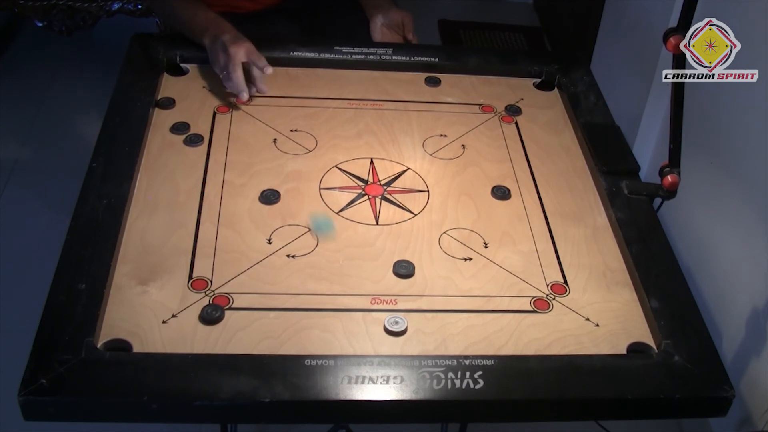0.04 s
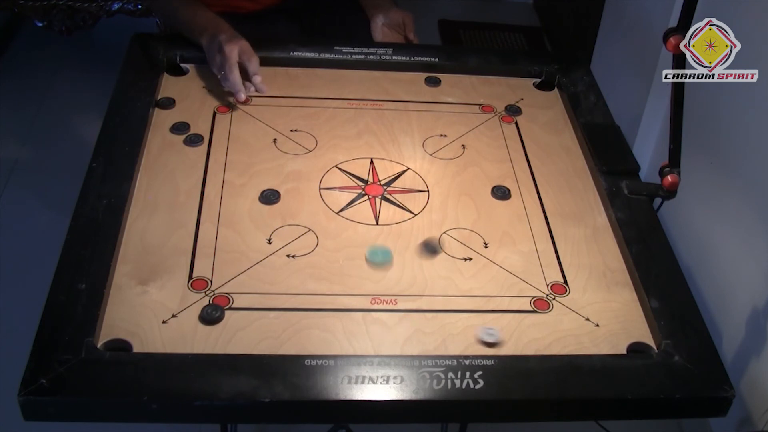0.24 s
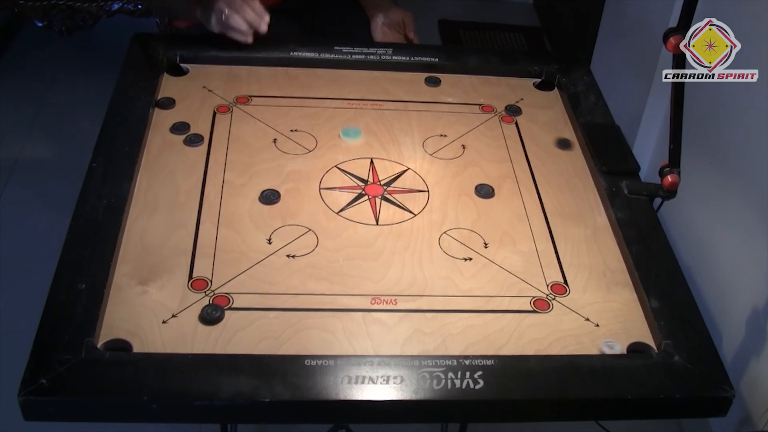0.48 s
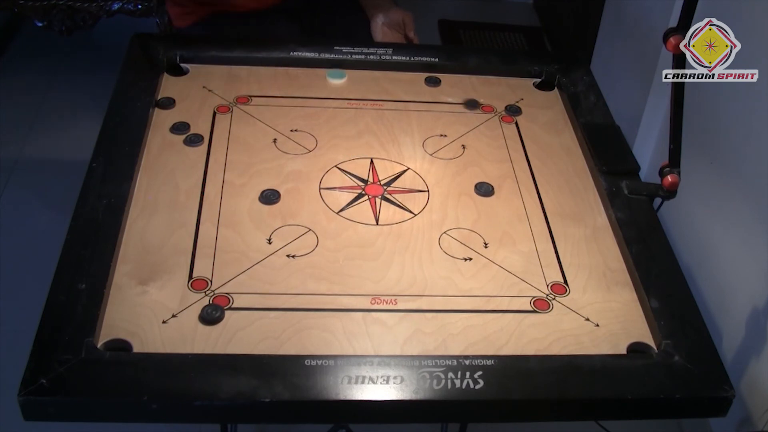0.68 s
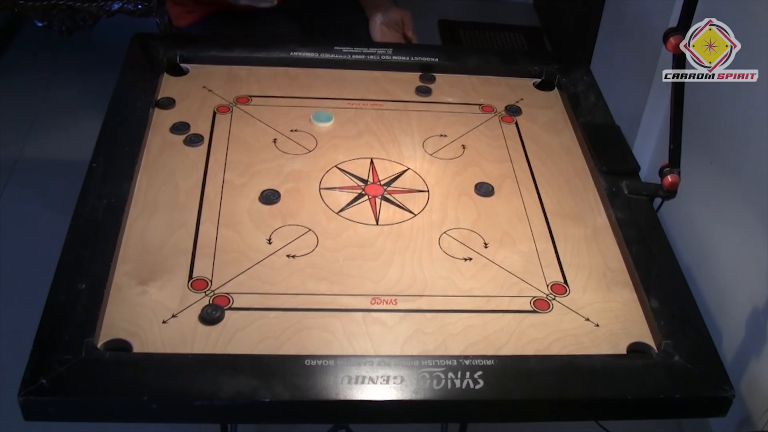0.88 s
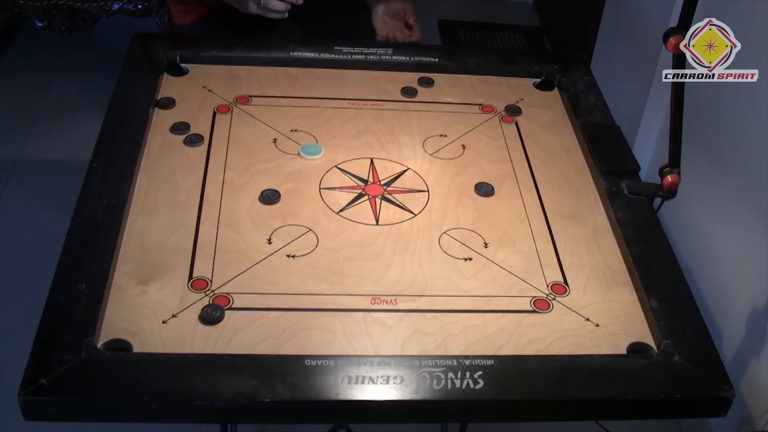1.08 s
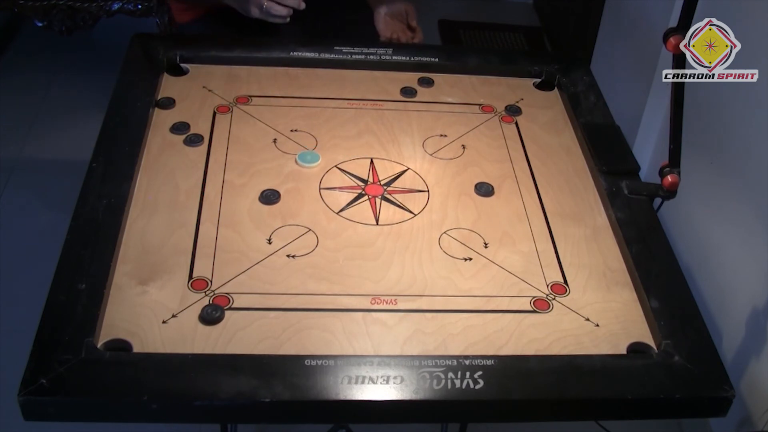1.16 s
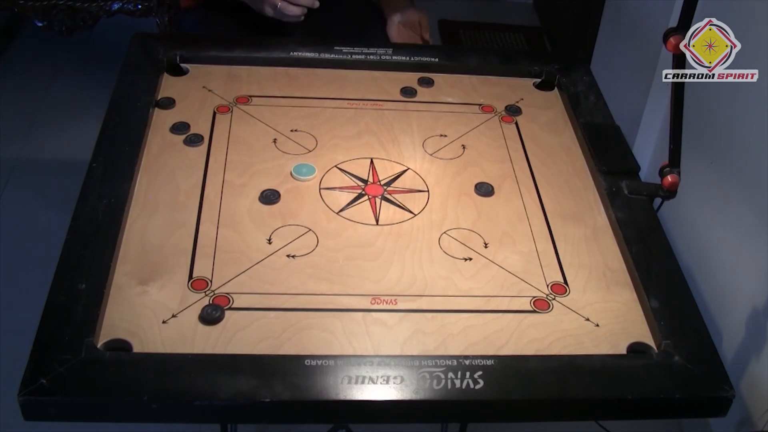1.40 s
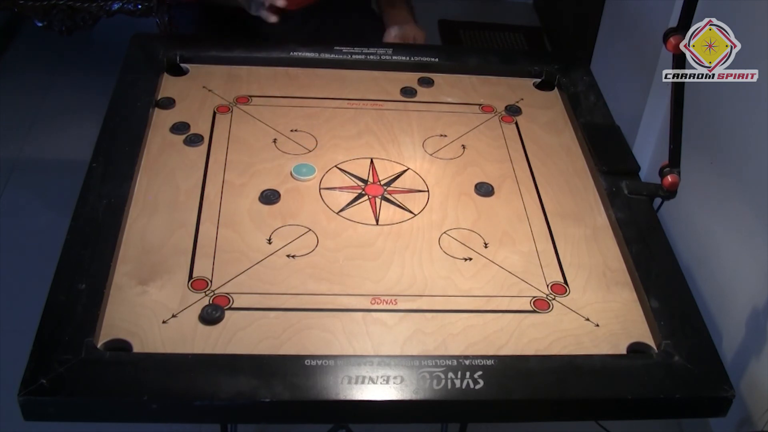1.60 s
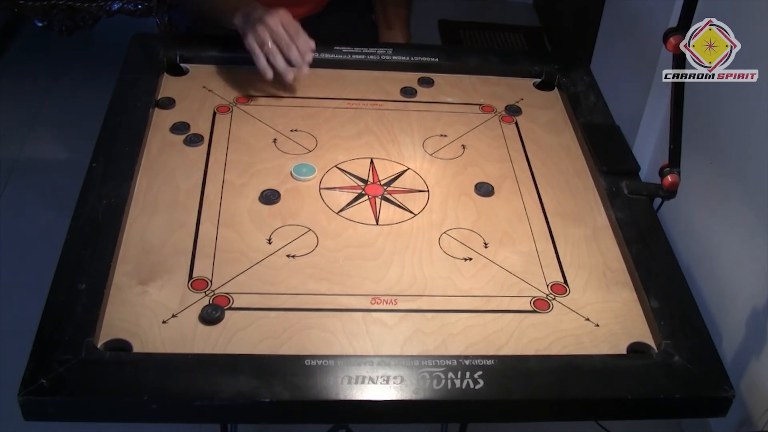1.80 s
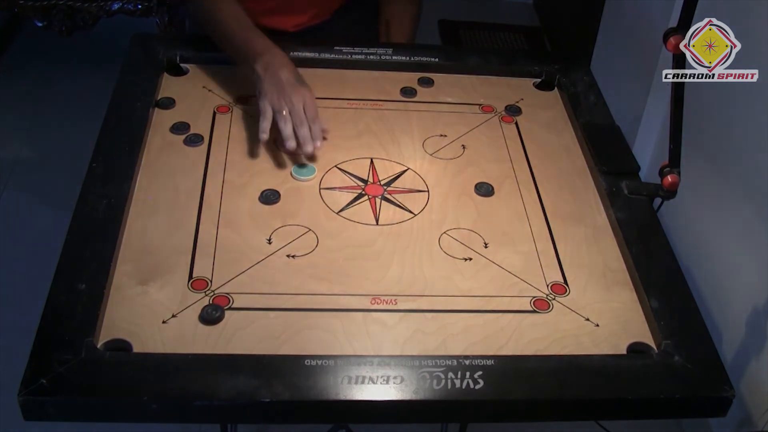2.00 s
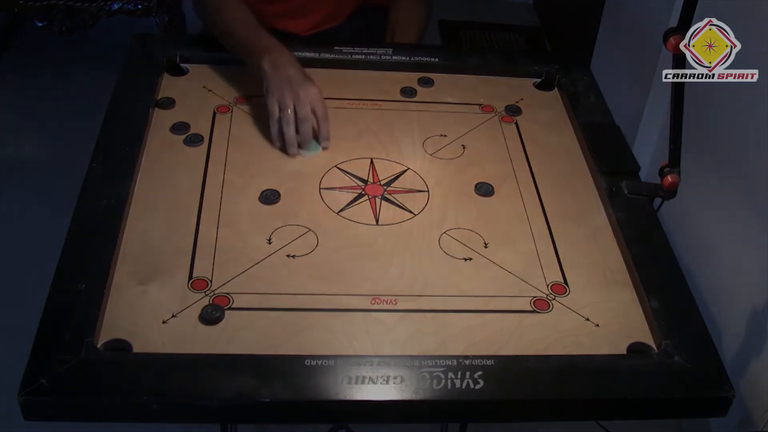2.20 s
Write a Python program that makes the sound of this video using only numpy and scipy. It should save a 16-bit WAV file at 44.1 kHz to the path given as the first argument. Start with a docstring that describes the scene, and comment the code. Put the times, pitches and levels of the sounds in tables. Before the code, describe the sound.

Carrom striker clacking sharply against wooden pieces and board edges in a quiet room

```python
"""In a quiet, hard-walled room a carrom board is still ringing from a knock as the striker is flicked.
It scrapes off over the plywood, and from 0.2 to 0.9 s it hits wooden pieces and rails: disc edges tick,
each blow is a short knock of the board with a faint ring, and the room answers. A limiter ducks the
loudest blows and their peaks clip. The striker glides to rest, ringing faintly at 1.4 s, and from 1.9 s
it is dragged back with a thin squeak. Throughout, a noise suppressor turns the quiet sound down."""
import sys
import numpy as np
from scipy import signal
from scipy.fft import rfft, irfft, next_fast_len
from scipy.io import wavfile
from scipy.ndimage import uniform_filter1d

SR = 44100
rng = np.random.default_rng(int(sys.argv[2]) if len(sys.argv) > 2 else 0)


def master(y):
    """Save y as 16-bit WAV."""
    cut = np.clip(np.atleast_2d(y).T, -1, 1)
    pcm = np.round(cut * 32767)  # scale
    wavfile.write(sys.argv[1], SR, pcm.astype(np.int16))


N = 99225

# Blows on the board. Each row: start in seconds, level before EQ in dB, four EQ gains in dB (bass,
# upper mid, treble, top), then board ring, rail ring, room send and left over right, all in dB.
BLOWS = [(-.07, -21, -17.5, 9, -8.5, -6, -11.5, -31.5, 0.5, -8),
         (.0422, -30, -8, 2.5, -25, -5, -13, -28.5, -9, -2.5),
         (.2120, 3, -2, -4, 1, -2, -7.5, -30.5, -4, -2),
         (.2178, -5, -7, -8.5, -2.5, -5.5, -13, -27, -17, -7),
         (0.4079, -37.5, -2.5, 0.5, 21, 15, -27, -31.5, 2.5, 2),
         (.5280, -19.5, -13, -8.5, 8, 10, -19.5, -6.5, 2, -1),
         (0.5292, -13, -16.5, 1, 4.5, 5, -18, 5, 0, -4),
         (.7287, -6.5, -1.5, -7, -6, -13.5, -8, -17, -3.5, -3),
         (.7312, -16, -4, 0, 6, 3, -21, -24, -1.5, 2.5),
         (.7495, -27, -9, -0.5, 14, 20, -18, -19.5, 3, -1.5),
         (0.7856, -29.5, -17, -7.5, 3, 0, -13, -27.5, -9, 9),
         (0.827, -31.5, 2, 12, -25, -4, -11, 2.5, 9, 2), (.8995, -19.5, -14, -8.5, 2, -18, -15, -2, -2, -2)]
# Where those four EQ gains sit, in Hz.
BLOW_EQ_HZ = [350, 2300, 4200, 10000]
# Partials of the board's damped knock, its lasting ring, the rail and the settling striker.
# Each row: pitch in Hz, relative level in dB, seconds to fall 60 dB.
KNOCK_MODES = [(556, -7, 0.036), (652, -3.5, 0.021), (801.3, 0, 0.067), (1179, -5.5, 0.089),
               (1416.7, -3.5, 0.11), (1491, -4.5, 0.051), (2230, 6.5, 0.017), (2900, -25.5, 0.04)]
RING_MODES = [(285, -5, .7), (404, -3, .5), (457, -0.5, 0.56), (653, -4, 0.93), (835, 4, 0.56),
              (1144, -9.5, 1), (1397, -1.5, 0.55), (1445, 5, 0.36), (1605, 6.5, 0.53), (1767, -6.5, 0.43),
              (2200, -9.5, 1), (2730, -14.5, 0.2), (2951, -3.5, 0.34), (3109, -4, 0.29)]
RAIL_MODES = [(724, -12, 0.25), (1092, 0, 0.037), (2190, -22, .04), (4888, -9, .012), (6060, -7.5, .012)]
STRIKER_MODES = [(1080, 0, 0.28), (1820, -8.5, 0.66), (1840, -10, 0.56), (2580, -6, 0.22),
                 (5250, -3.5, 0.15), (5620, -9, 0.194), (5760, -11, 0.14)]
# Tone of the clatter (the dense upper modes of board and discs), the reverb and the still air.
# Each row: frequency in Hz, relative level in dB.
CLATTER_COLOUR = [(100, -28.5), (250, -17.5), (480, -1), (900, 2.5), (1500, 5), (2800, -2), (4000, -11),
                  (6000, -10.5), (10000, -20), (13000, -26.5), (15500, -25)]
ROOM_COLOUR = [(300, 2), (450, 2), (800, 0), (1050, -2), (1480, 1), (1950, 1.5), (2400, 0), (3000, 3),
               (3900, -2), (6000, 0.5), (7500, -5.5), (9000, 3), (11000, -0.5)]
AIR_COLOUR = [(15, -52), (25, -20), (64, -9), (176, -4), (207, -15.5), (257, -4.5), (501, -12.5),
              (573, -5.5), (621, -12), (903, -11), (2370, -29), (15000, -47.5)]
# Length of the reverb. Each row: frequency in Hz, seconds to fall 60 dB.
ROOM_DECAY = [(200, 1), (800, 0.68), (2500, 0.66), (6000, 0.54), (14000, 0.33)]
# Stereo width of reverb, air and friction. Each row: frequency in Hz, side over mid in dB.
STEREO_WIDTH = [(200, -8), (1000, -10.5), (2500, -9.5), (5000, -5.5), (10000, 0.5)]
# Fader moves for the gliding discs, the scrape after the flick and the drag back.
# Each row: time in seconds, level in dB.
GLIDE_FADER = [(0, -45), (1.0, -64.5), (1.25, -49), (1.43, -48), (1.6, -62.5), (1.9, -75.5)]
LAUNCH_FADER = [(.04, -70), (.048, -31.5), (.08, -36.5), (.105, -39.5), (.15, -60), (.19, -79)]
DRAG_FADER = [(1.9, -75), (2.03, -58.5), (2.12, -49.5), (2.2, -49), (2.25, -47)]
# Tone of the same three slides. Each row: frequency in Hz, relative level in dB.
GLIDE_COLOUR = [(100, -21.5), (280, 3), (700, -1), (1500, 0.5), (2500, -12.5), (5000, -19), (9000, -22.5),
                (12000, -27), (15000, -26)]
LAUNCH_COLOUR = [(100, -21), (300, 7), (550, -5), (850, 5.5), (1200, -4.5), (1700, 0), (2350, -5),
                 (3300, -36.5), (5200, -39), (6200, -17.5), (8000, -30.5), (14000, -30)]
DRAG_COLOUR = [(100, -9.5), (500, 4.5), (1500, 2.5), (2250, -6), (3300, -7), (5500, -6.5), (8300, -9),
               (10000, -15.5), (15200, -18.5)]
# Soft thumps of the hand on the board. Each row: start in seconds, gain in dB, rise in seconds.
HAND_THUMPS = [(.043, -33.5, 0.023), (2.141, -37.5, 0.032)]
# Sharp ticks of disc edges.
# Each row: start in seconds, peak before panning in dB, pitch in Hz, left over right in dB.
EDGE_TICKS = [(.1903, -31, 4260, 2.5), (.1923, -14.5, 3900, 6.5), (.2113, -20.5, 5004, 0),
              (.2120, 10.5, 3700, 6), (.2812, -16, 5407, 0), (.3938, -3, 4570, 1), (.8453, -12.5, 3740, 0)]
# Resonances of the dragged striker. Each row: centre in Hz, width in Hz, dB relative to the drag fader.
SQUEAK_BANDS = [(2220, 220, -6), (3150, 250, -14), (4900, 400, -10.5), (5600, 400, -14)]
# Where the noise suppressor is half closed. Each row: frequency in Hz, level in dB per bin.
GATE_THRESHOLD = [(150, -50.5), (1000, -50), (2500, -66), (5500, -70.5), (11000, -74.5)]


def undb(db):
    """Decibels to gain."""
    return 10 ** (np.asarray(db) / 20)


def curve_at(freqs, points):
    """Read (Hz, value) points on a log-frequency axis."""
    hz, values = np.array(points, float).T
    return np.interp(np.log(np.maximum(freqs, 1)), np.log(hz), values)


def unit_energy(x):
    """Scale to an average energy of 1 per channel."""
    return x / np.sqrt(np.mean(np.sum(x ** 2, axis=-1)))


def equalise(x, points):
    """Minimum-phase EQ through (Hz, dB) points, so nothing rings ahead of an attack."""
    n = 2 * next_fast_len(x.shape[-1])
    freqs = np.arange(n // 2 + 1) * SR / n
    cepstrum = irfft(curve_at(freqs, points) * np.log(10) / 20)
    cepstrum[1:n // 2] *= 2
    cepstrum[n // 2 + 1:] = 0
    return irfft(rfft(x, n) * np.exp(rfft(cepstrum)))[..., :x.shape[-1]]


def wide_noise():
    """Stereo noise, narrow in the bass and wider in the treble."""
    mid, side = rng.standard_normal((2, N))
    side = equalise(side, STEREO_WIDTH)
    return np.array([mid + side, mid - side])


def attack(t, rise_s):
    """Envelope that eases up from 0 to 1."""
    return 1 - np.exp(-t / rise_s)


def decay(t, t60_s):
    """Envelope that falls 60 dB in t60_s."""
    return np.exp(-np.log(1000) * t / t60_s)


def fader(points):
    """Gain that rides a unit-energy noise along (seconds, dB) points."""
    times, levels_db = np.array(points).T
    return np.sqrt(N) * undb(np.interp(np.arange(N) / SR, times, levels_db))


def pan(db):
    """Left and right gains; positive dB leans left."""
    return undb(np.array([[db], [-db]]) / 2)


def add(out, x, start_s):
    """Mix x into out at a start time, trimming what falls outside the scene."""
    start = int(round(start_s * SR))
    first, last = max(start, 0), min(start + x.shape[-1], N)
    out[..., first:last] += x[..., first - start:last - start]


def struck_modes(table, t, rise_s):
    """A struck body: decaying partials of alternating sign, with an energy of 1."""
    partials = sum((-1) ** k * undb(db) * np.sin(2 * np.pi * hz * t) * decay(t, t60)
                   for k, (hz, db, t60) in enumerate(table))
    return unit_energy(partials * attack(t, rise_s))


def board_blows():
    """Each blow sets board and rail ringing, with its own EQ; returns direct sound and room send."""
    contact_s, clatter_db = 0.00049, 0.5
    knock_send_db, rail_send_db = -5, -2
    t = np.arange(int(0.75 * SR)) / SR
    knock = struck_modes(KNOCK_MODES, t, contact_s)
    ring = struck_modes(RING_MODES, t, contact_s)
    rail = struck_modes(RAIL_MODES, t, rise_s=0.0015)
    burst = attack(t, rise_s=0.0011) * decay(t, t60_s=0.027)
    bass_cut = signal.butter(2, 240, "high", fs=SR)
    direct, send = np.zeros((2, N)), np.zeros(N)
    for start, db, *eq_db, ring_db, rail_db, send_db, pan_db in BLOWS:
        noise = rng.standard_normal(len(t)) * burst
        clatter = unit_energy(equalise(noise, CLATTER_COLOUR)) * undb(clatter_db)
        board = unit_energy(signal.lfilter(*bass_cut, knock + clatter))
        board_send = unit_energy(signal.lfilter(*bass_cut, undb(knock_send_db) * knock + clatter))
        layers = np.array([board, board_send, undb(rail_db) * rail, undb(ring_db) * ring])
        eq = sorted([(1200, 0), *zip(BLOW_EQ_HZ, eq_db)])  # pinned to 0 dB at 1200 Hz
        # Before EQ, board and rail share the energy of 10 ms at the blow's level.
        gain = undb(db) * np.sqrt(0.01 * SR) / np.hypot(1, undb(rail_db))
        board, board_send, rail_tock, board_ring = equalise(layers, eq) * gain
        add(direct, (board + rail_tock + board_ring) * pan(pan_db), start)
        add(send, (board_send + undb(rail_send_db) * rail_tock) * undb(send_db), start)
    return direct, send


def room_reverb(send):
    """Dense reflections off hard walls build up after a short gap and fade, the treble first."""
    predelay_s = 0.0038
    t, freqs = np.arange(N) / SR, np.arange(N // 2 + 1) * SR / N
    spectrum = rfft(equalise(wide_noise(), ROOM_COLOUR))
    tail = np.zeros((2, N))
    for hz, t60 in ROOM_DECAY:
        band = curve_at(freqs, [(centre, float(centre == hz)) for centre, _ in ROOM_DECAY])
        tail += irfft(spectrum * band, N) * decay(t, t60)
    build_up = attack(np.maximum(t - predelay_s, 0), rise_s=0.0039)
    response = unit_energy(tail * build_up)
    return signal.fftconvolve(send[None], response, axes=1)[:, :N] * pan(-1.2)


def still_air(level_db):
    """A steady, dark bed of room tone."""
    return unit_energy(equalise(wide_noise(), AIR_COLOUR)) * np.sqrt(N) * undb(level_db)


def disc_slide(levels, colour, grain_db, pan_db):
    """A disc rubs over the powdered board: friction noise with a fast, grainy flutter in level."""
    grain = uniform_filter1d(rng.standard_normal(N), size=200)
    friction = wide_noise() * undb(grain_db * grain / grain.std())
    return unit_energy(equalise(friction, colour)) * fader(levels) * pan(pan_db)


def hand_thumps(pitch_hz):
    """The board's lowest note swells under the hand and dies away."""
    t, out = np.arange(N) / SR, np.zeros(N)
    note = np.sin(2 * np.pi * pitch_hz * t) * decay(t, t60_s=0.5)
    for start, db, rise_s in HAND_THUMPS:
        add(out, note * attack(t, rise_s) * undb(db), start)
    return out


def edge_ticks(send_db):
    """Disc edges touch in clicks of a cycle or two; returns direct sound and room send."""
    t = np.arange(SR // 50) / SR
    envelope = attack(t, rise_s=0.00008) ** 2 * decay(t, t60_s=0.001)
    direct, send = np.zeros((2, N)), np.zeros(N)
    for start, peak_db, hz, pan_db in EDGE_TICKS:
        click = -np.sin(2 * np.pi * hz * t) * envelope
        click *= undb(peak_db) / np.abs(click).max()
        add(direct, click * pan(pan_db), start)
        add(send, click * undb(send_db), start)
    return direct, send


def striker_settle(start_s, energy_db):
    """The striker rings faintly as it comes to rest."""
    t, out = np.arange(N) / SR, np.zeros(N)
    add(out, struck_modes(STRIKER_MODES, t, rise_s=0.022) * undb(energy_db), start_s)
    return out


def drag_squeaks(waver_db):
    """Narrow resonances come and go while the striker is dragged."""
    out = np.zeros((2, N))
    for hz, width_hz, db in SQUEAK_BANDS:
        waver = uniform_filter1d(rng.standard_normal(N), size=1500)
        waver = uniform_filter1d(waver, size=1000)
        band = signal.lfilter(*signal.iirpeak(hz, hz / width_hz, SR), wide_noise())
        out += unit_energy(band) * undb(db + waver_db * waver / waver.std())
    return out * fader(DRAG_FADER)


def scene():
    """Knocks and ticks sit up front and feed the reverb; slides, thumps and air lie underneath."""
    knocks, knock_send = board_blows()
    air = still_air(level_db=-47.5)
    glide = disc_slide(GLIDE_FADER, GLIDE_COLOUR, grain_db=2.35, pan_db=2)
    launch = disc_slide(LAUNCH_FADER, LAUNCH_COLOUR, grain_db=-0.5, pan_db=-1)
    thumps = hand_thumps(pitch_hz=127)
    ticks, tick_send = edge_ticks(send_db=-7.5)
    settle = striker_settle(start_s=1.39, energy_db=-19.5)
    drag = disc_slide(DRAG_FADER, DRAG_COLOUR, grain_db=-1.0, pan_db=-2.46)
    squeaks = drag_squeaks(waver_db=4)
    reverb = room_reverb(knock_send + tick_send)
    return knocks + reverb + air + glide + launch + thumps + ticks + settle + drag + squeaks


def limiter(x, threshold_db, release_db_per_s):
    """Gain drops at once on a loud blow and recovers at a steady rate."""
    power = uniform_filter1d(np.mean(x ** 2, axis=0), size=400)
    level_db = 10 * np.log10(np.maximum(power, 1e-12))
    excess_db = np.maximum(level_db - threshold_db, 0)
    release_ramp = release_db_per_s * np.arange(N) / SR
    duck_db = np.maximum.accumulate(excess_db + release_ramp) - release_ramp
    return x * undb(-duck_db)


def noise_suppressor(x, depth_db):
    """A soft gate on every band turns down whatever falls under its threshold."""
    freqs, _, spectra = signal.stft(x, SR, nperseg=512)
    power = np.mean(np.abs(spectra) ** 2, axis=0)
    power = uniform_filter1d(power, size=5, axis=0)  # smooth across frequency
    power = uniform_filter1d(power, size=3, axis=1)  # and across time
    threshold = undb(curve_at(freqs, GATE_THRESHOLD))[:, None] ** 2
    closed = 1 / (1 + np.maximum(power, 0) / threshold)
    return signal.istft(spectra * undb(depth_db * closed), SR, nperseg=512)[1][:, :N]


def record(dry):
    """The master chain: limiter, noise suppressor, hard clip and a steep top cut at 16 kHz."""
    ducked = limiter(dry, threshold_db=-7.5, release_db_per_s=69)
    gated = noise_suppressor(ducked, depth_db=-14)
    top_cut = signal.ellip(8, 0.2, 70, 16000, fs=SR, output="sos")
    return signal.sosfilt(top_cut, np.clip(gated, -1, 1))


dry = scene()
out = record(dry)
master(out)
```